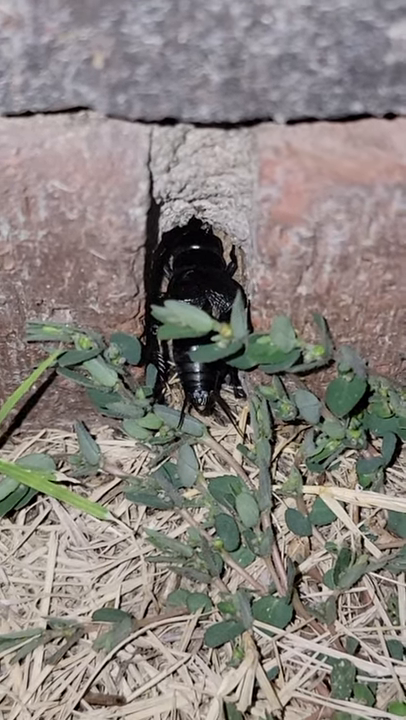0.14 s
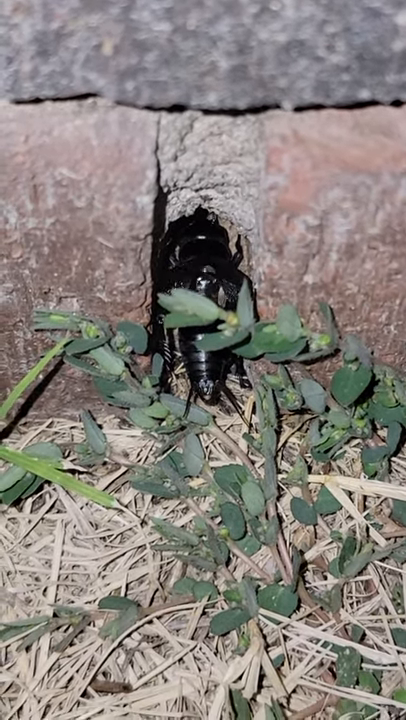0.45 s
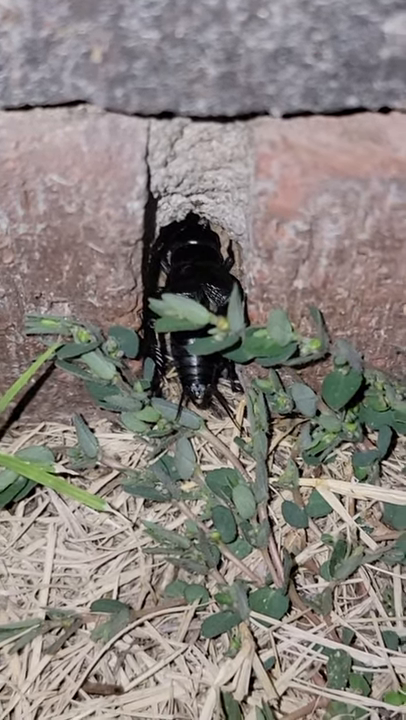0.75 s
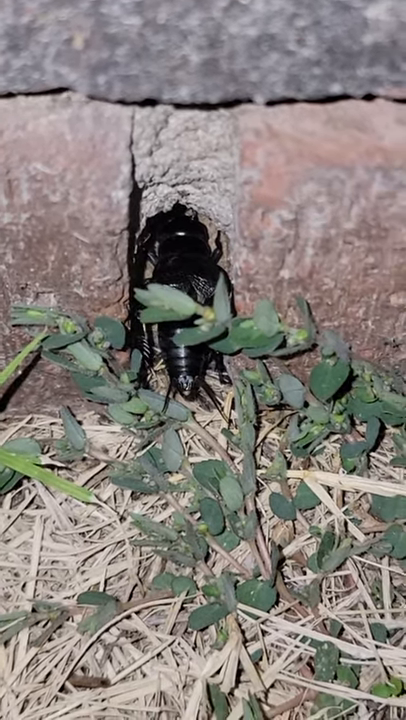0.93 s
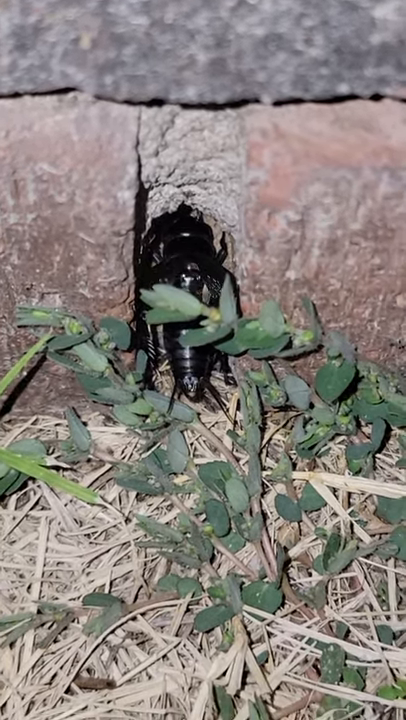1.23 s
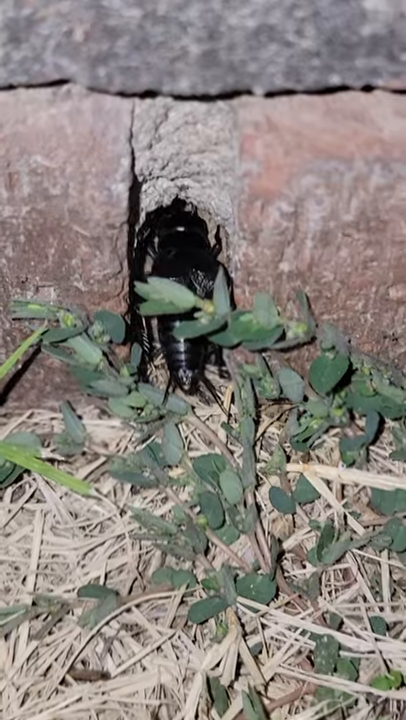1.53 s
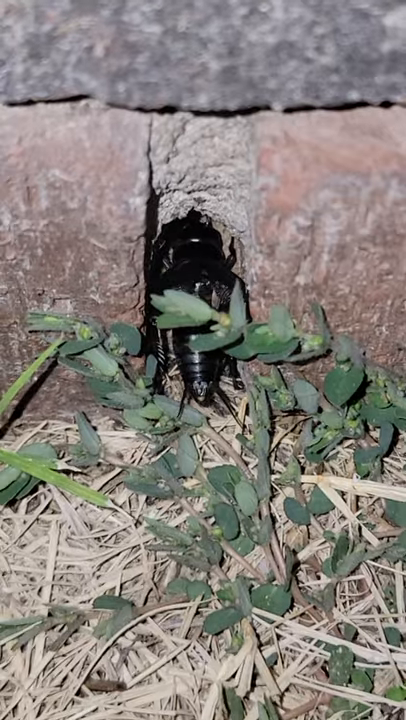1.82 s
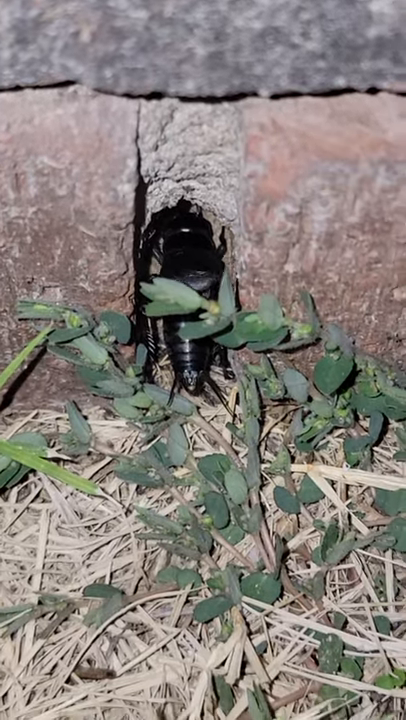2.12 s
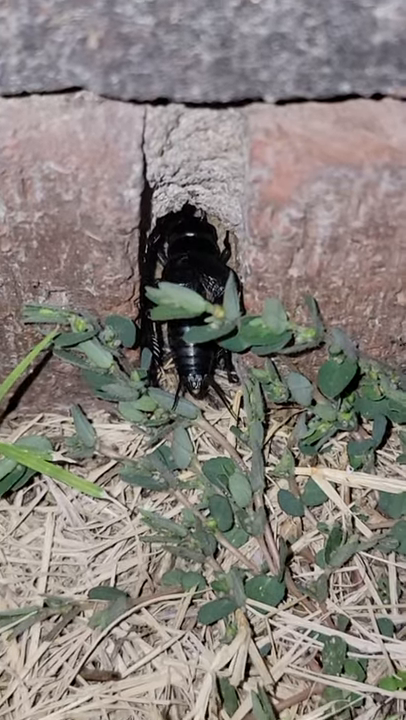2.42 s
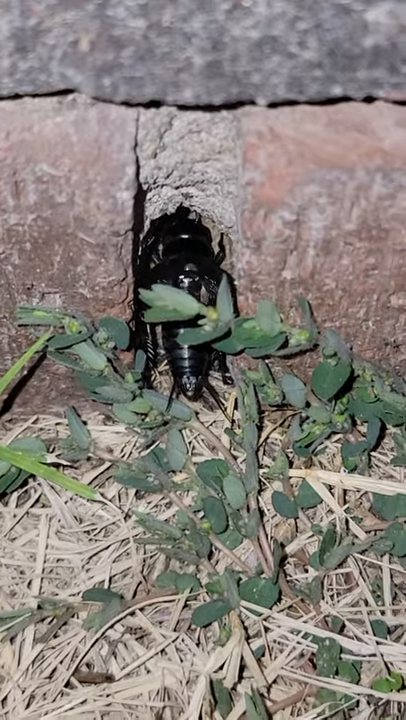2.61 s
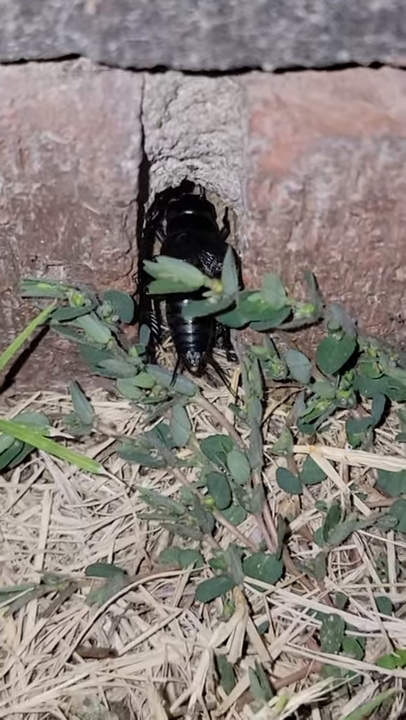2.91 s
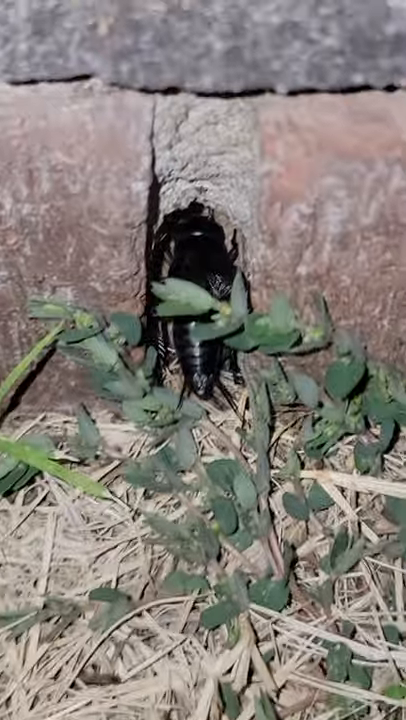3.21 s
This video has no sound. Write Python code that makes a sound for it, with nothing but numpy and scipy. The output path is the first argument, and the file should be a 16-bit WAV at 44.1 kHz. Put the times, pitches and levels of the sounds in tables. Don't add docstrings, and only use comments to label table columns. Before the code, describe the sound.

A close field cricket gives four bright, pure chirps near 4 kHz, at about 0.4, 1.1, 1.85 and 2.6 seconds, each four quick pulses growing stronger. Distant traffic rumbles softly while a car fades away; a thin far squeak sounds at 0.6. Light phone thumps come around 1.3 to 2.3, then heavy knocks, ticks and grassy rustling from 2.9, with a final cricket note at 3.3.

```python
import sys
import numpy as np
from scipy import signal
from scipy.fft import rfft, irfft
from scipy.io import wavfile
from scipy.ndimage import uniform_filter1d

SR = 44100
rng = np.random.default_rng(int(sys.argv[2]) if len(sys.argv) > 2 else 0)


def natural_amplitude(level_db):
    exponent = np.asarray(level_db, float) / 20
    return 10 ** exponent


def put_to_file(sound):
    columns = np.atleast_2d(sound).T
    safe = np.clip(columns, -1, 1)
    whole_steps = np.round(safe * 32767)
    wavfile.write(sys.argv[1], SR, whole_steps.astype(np.int16))


N = 147735
LEFT_LAG_S = 0.00042

# time in seconds, half-width of the gap in seconds, snap level in dB.
SKIP_MOMENTS = [(0.4225, .0002, -44), (0.4284, .001, -38), (0.432, .001, -42), (0.4348, .001, -42),
                (0.438, .0012, -45.5), (0.441, .0003, -44), (1.205, 0.00025, -54), (1.8587, .0015, -41),
                (1.863, .002, -43.5), (1.866, .0012, -35), (1.929, .0012, -34.5), (2.583, .0002, -43),
                (2.5865, .0009, -42.5), (2.589, .0008, -42), (2.5935, .001, -38.5), (2.598, .0012, -51),
                (2.6, .0008, -42.5), (3.335, 0.00078, -34), (3.339, 0.00075, -42.5), (3.3435, .001, -41),
                (3.348, .001, -44)]


def evened(x):
    return x / np.sqrt(np.mean(x ** 2) + 1e-20)


def read(points, hz):
    f, value = np.transpose(points)
    return np.interp(np.log(hz + 1), np.log(f + 1), value)


def add(mix, s, sound):
    part = mix[..., round(s * SR):][..., :sound.shape[-1]]
    part += sound[..., :part.shape[-1]]


def panned(pan_db):
    return natural_amplitude([[min(pan_db, 0)], [min(-pan_db, 0)]])


def noise(colour, same, patchy_db, size):
    hop = size // 4
    hz = np.fft.rfftfreq(size, 1 / SR)
    a, b, c, d, patches = rng.standard_normal((N // hop + 9, len(hz), 5)).T
    patches = uniform_filter1d(patches, size=8, axis=0)
    patches = evened(uniform_filter1d(patches, size=8, axis=1))
    same = np.clip(read(same, hz), -1, 1)[:, None]
    left = a + 1j * b
    right = same * left + np.sqrt(1 - same ** 2) * (c + 1j * d)
    z = np.array([left, right]) * natural_amplitude(read(colour, hz)[:, None] + patchy_db * patches)
    return evened(signal.istft(z, nperseg=size, noverlap=size - hop)[1][:, size:size + N])


def traffic():
    # frequency in Hz, level in dB per Hz.
    rumble_colour = [(8.8, -58), (15, -34.5), (37, -4.5), (70, 1.5), (124, -5), (144, -19.5), (223, -11.5),
                     (262, -23.5), (500, -39), (650, -38), (1100, -120)]
    # frequency in Hz, level in dB per Hz.
    hush_colour = [(180, -49), (300, -11), (518, -10), (1080, -21), (1190, -27.5), (1380, -23.5),
                   (1800, -34), (3210, -38.5), (15800, -58)]
    # frequency in Hz, level in dB per Hz.
    car_colour = [(150, -43), (230, -6.5), (340, 2), (450, -4), (620, -12.5), (1000, -37.5), (3000, -89.5)]
    # frequency in Hz, likeness from 0 to 1.
    likeness = [(60, 0.82), (130, 1), (290, 1), (640, 0.01), (1410, 0.11), (3100, 0), (15000, 0)]
    # time in seconds, level in dB.
    passing = [
        (0, 1),
        (.5, 1),
        (1.2, 1.5),
        (2, 0),
        (2.6, 1),
        (3.35, 4),
    ]
    t = np.arange(N) / SR
    swell_db = np.interp(t, *np.transpose(passing))
    rumble = noise([(5, -84.5)] + rumble_colour + [(700, -80)], likeness, patchy_db=1, size=4096)
    rumble = rumble * natural_amplitude(-33.5 + 0.28 * swell_db) * natural_amplitude([[.8], [-.8]])
    hush = noise([(200, -65)] + hush_colour, likeness, patchy_db=1.73, size=1024)
    hush = hush * natural_amplitude(-49.5 + swell_db)
    car = noise(car_colour, likeness, patchy_db=2.0, size=2048)
    fade_db_per_s = -14.5
    return rumble + hush + car * natural_amplitude(-43 + fade_db_per_s * t)


def far_squeak():
    # time in seconds, pitch in Hz, level in dB.
    glide = [
        (0.499, 1380, -82),
        (0.521, 1382, -60),
        (0.571, 1370, -47),
        (.63, 1345, -41.5),
        (0.661, 1300, -58),
        (0.684, 1300, -85),
        (.75, 1330, -76),
        (.77, 1330, -51),
        (.79, 1320, -93),
    ]
    t = np.arange(N) / SR
    s, hz, db = np.transpose(glide)
    phase = 2 * np.pi * np.cumsum(np.interp(t, s, hz)) / SR
    return natural_amplitude(np.interp(t, s, db, -200, -200)) * np.sin(phase)


def street():
    t = np.arange(N) / SR
    left, right = traffic() + far_squeak()
    return np.array([np.interp(t - LEFT_LAG_S, t, left), right])


def rustle():
    # frequency in Hz, level in dB per Hz.
    grass_colour = [(290, -60), (500, -25), (782, -10.5), (1040, -6.5), (2180, -11), (5500, -19),
                    (9000, -30.5), (15800, -48)]
    # time in seconds, level in dB.
    rubbing = [(2.89, -69.5), (2.95, -54), (2.96, -47), (2.997, -54.5), (3.0, -39.5), (3.04, -51.5),
               (3.11, -50.5), (3.205, -56.5), (3.208, -36.5), (3.225, -39), (3.24, -43), (3.28, -39.5),
               (3.35, -43.5)]
    t = np.arange(N) / SR
    grass = noise(grass_colour, [(600, 0.21), (1400, 0.72), (3100, 0.26)], patchy_db=1.5, size=256)
    return grass * natural_amplitude(np.interp(t, *np.transpose(rubbing))) * (t > rubbing[0][0])


def knocks():
    # time in seconds, peak level in dB, starting pitch in Hz, left-right balance in dB,
    # time to fade by 60 dB in seconds.
    thumps = [(1.291, -7, 136, 14, 0.033), (1.449, -8, 137, 11.5, 0.097), (1.502, -20, 106.3, -2, 0.067),
              (2.212, -19, 138, 9, 0.025), (2.22, -14.5, 110, 19, 0.075), (2.309, -10, 120.5, 13.5, 0.12),
              (2.85, -17, 93, 5.5, 0.13), (2.905, -16, 155, 16, 0.17), (2.92, -11, 99, 11, 0.42),
              (2.9638, 4, 114, 15, 0.013), (2.983, -2.5, 251, 14, 0.0099), (2.988, -4, 70.5, 4.5, 0.072),
              (3.005, -5.5, 80, -8.5, 0.045), (3.0406, -5.5, 303, -18, 0.021), (3.0534, 3, 118.6, -4, 0.04),
              (3.156, -13.5, 124, -3, 0.07), (3.212, -9.5, 256, -7.5, 0.011),
              (3.2345, -15.5, 300, -10, 0.008), (3.2332, -14.5, 134, -0.5, 0.11)]
    out = np.zeros((2, N))
    lead, low_hz, sag_s, rise_s = .01, 62, .008, .0025
    t = np.arange(0, .2, 1 / SR) - lead
    after = np.maximum(t, 0)
    for s, peak_db, hz, pan_db, t60 in thumps:
        sagging = low_hz * t + (hz - low_hz) * sag_s * (1 - np.exp(-after / sag_s))
        turns = np.where(t < 0, hz * t, sagging)
        env = natural_amplitude(peak_db - 60 * after / t60) / (1 + np.exp(-(t - 0.26 / hz) / rise_s * hz / 130))
        env = env * np.minimum((t + lead) / lead * 2, 1)
        overtone = 0.39 * np.cos(4 * np.pi * turns + 0.18) * np.exp(-abs(t) / 0.0021)
        thud = np.cos(2 * np.pi * turns) + overtone
        add(out, s - lead, panned(pan_db) * env * 1.445 * thud)
    return out


def pulls():
    # time in seconds, depth in dB, width in seconds, left-right balance in dB.
    dips = [
        (2.9613, -9.5, 0.00072, 10),
        (3.052, 2.5, 0.00083, -9.5),
        (3.2328, -7.5, .0004, -8.5),
    ]
    t = np.arange(N) / SR
    out = np.zeros((2, N))
    for s, depth_db, width, pan_db in dips:
        out -= panned(pan_db) * natural_amplitude(depth_db) * np.exp(-((t - s) / width) ** 2)
    return out


def tick(peak_db, pan_db, top_hz):
    t = np.arange(1200) / SR
    rattle = rng.standard_normal((3, len(t)))
    both_sides, each_side = rattle[:1], rattle[1:]
    t60_s, snap = .012, 2.5
    sound = (both_sides + 1.8 * each_side) * natural_amplitude(-60 * t / t60_s) + snap * (t == 0)
    for order, hz, kind in ((2, 490, "high"), (1, 1770, "low"), (3, top_hz, "low")):
        sound = signal.lfilter(*signal.butter(order, hz, kind, fs=SR), sound)
    return panned(pan_db) * natural_amplitude(peak_db + 3.5) * sound / abs(sound).max()


def handling():
    # time in seconds, peak level in dB, left-right balance in dB, highest frequency in Hz.
    case_ticks = [(2.9159, -36, 5.5, 4800), (2.9555, -29, 1, 3000), (2.963, -41, -5, 3000),
                  (2.96, -48, 5, 6000), (2.968, -54, 14, 4960), (2.981, -33.5, -10, 2500),
                  (2.9993, -27, 8, 4430), (3.0005, -27.5, -1, 2950), (3.0045, -56, 7, 6900),
                  (3.007, -38, 16, 3500), (3.0503, -24.5, 2.5, 7400), (3.208, -20, -12, 4470),
                  (3.2093, -37.5, 7, 5800), (3.218, -29, 22, 3400), (3.2328, -19, -10, 1450)]
    out = rustle() + knocks() + pulls()
    for s, *row in case_ticks:
        add(out, s, tick(*row))
    return out


def wing(drive):
    # frequency in Hz, width in Hz, level in dB.
    resonances = [(2060, 680, -7.5), (2870, 750, -3), (3706, 350, 11), (4420, 270, 2.5), (5300, 590, -5.5),
                  (6140, 750, 3), (7300, 320, -4.5), (8850, 1100, -8), (12300, 3300, -12.5),
                  (15000, 3200, -17)]
    out = 0
    for hz, width, db in resonances:
        b, a = signal.iirpeak(hz, hz / width, SR)
        out = out + natural_amplitude(db) * signal.lfilter(b, a, signal.lfilter(b, a, drive))
    return out


def stroke(start, length, level_db, top_hz, lag):
    catch_s, rest_hz = 0.0017, 3683
    t = np.arange(0, length + .006, 1 / SR) - lag - catch_s
    u = np.clip(t / (length - catch_s), 0, 1)
    span = max(top_hz - rest_hz, 40)
    turn = length - span / 29000
    climb = np.sin(np.pi / 2 * np.clip(t / turn, 0, 1)) ** 2
    sag = np.clip((t - turn) / (length - turn), 0, 1) ** 1.9
    sag = sag * np.interp(top_hz, (4100, 4250), (.45, 1))
    hz = top_hz - span * (0.32 * (1 - climb) + sag)
    phase = 2 * np.pi * (np.cumsum(hz) / SR - lag * hz[0])
    attack_share, release_share = 0.32, 0.28
    env = np.sin(np.pi / 2 * np.clip(u / attack_share, 0, 1)) ** .7
    env = env * np.clip((1 - u) / release_share, 0, 1) ** .5
    env = uniform_filter1d(uniform_filter1d(np.roll(env, 24), size=24), size=24)
    for s, gap, _ in SKIP_MOMENTS:
        env = env * (1 - np.exp(-((start + t - s) / gap) ** 2))
        phase = phase + 2.4 * (start + t > s)
    second_db = -20.5 - 24 * (u - 0.64) ** 2
    third_db = -30.5 + .5 * (level_db + 38.5) - 100 * (u - 0.41) ** 2
    upper = natural_amplitude(second_db) * np.sin(2 * phase) + natural_amplitude(third_db) * np.sin(3 * phase)
    is_left = lag > 0
    side_db = (-7 + 7.5 * (top_hz - 4240) / 1000) * is_left
    upper = upper * natural_amplitude(-3.5 * is_left + 0.12 * (level_db + 17))
    return natural_amplitude(level_db + 3.5 + side_db) * env * (np.sin(phase) + upper)


def hiss(drive, low_hz):
    return signal.lfilter(*signal.butter(4, low_hz, "high", fs=SR), drive * rng.standard_normal(N))


def yard_echo(sound):
    t60_s = 0.36
    t = np.arange(SR // 2) / SR
    tail = rng.standard_normal((2, len(t))) * natural_amplitude(-60 * t / t60_s) * np.minimum(t / .012, 1)
    tail = signal.lfilter(*signal.butter(2, 6000, fs=SR), tail)
    tail = tail / np.linalg.norm(tail[0])
    return natural_amplitude(-39.5) * signal.fftconvolve(sound[None], tail, axes=1)[:, :N]


def cricket():
    # start in seconds, length in seconds, level in dB, top pitch in Hz.
    closings = [(0.4216, 0.022, -37.5, 3870), (0.484, 0.029, -36.5, 4024), (0.571, 0.039, -28, 4264),
                (0.6808, 0.044, -28, 4266), (1.1278, 0.026, -35.5, 4040), (1.1887, 0.034, -32.5, 4080),
                (1.278, 0.045, -28, 4250), (1.3933, 0.044, -28, 4260), (1.848, 0.025, -36, 3880),
                (1.9092, 0.037, -34, 4160), (1.9918, 0.045, -28.5, 4250), (2.102, 0.046, -28.5, 4263),
                (2.579, 0.024, -36, 3870), (2.6423, 0.029, -35.5, 4037), (2.723, 0.041, -28.5, 4237),
                (2.8336, 0.045, -29.5, 4260)]
    # start in seconds, length in seconds, level in dB, top pitch in Hz.
    touches = [
        (0.381, 0.024, -54.5, 3770),
        (1.091, 0.025, -53, 3670),
        (1.813, 0.022, -55, 3630),
        (2.535, 0.033, -53, 3720),
        (3.197, 0.0058, -49, 3970),
        (3.325, 0.088, -31, 4070),
    ]
    song, drive, t = np.zeros((2, N)), np.zeros(N), np.arange(N) / SR
    for start, length, level_db, top_hz in closings + touches:
        both = np.array([stroke(start, length, level_db, top_hz, lag) for lag in (LEFT_LAG_S, 0)])
        if level_db < -50:
            both = both * evened(uniform_filter1d(rng.standard_normal(4000), size=130))[:both.shape[1]]
        add(song, start, both)
        for s, snap_db in ((start - 0.00083, -14.5), (start + length, -30.5)):
            drive += natural_amplitude(level_db + snap_db) * np.exp(-((t - s) / .002) ** 2)
    reopen_after_s, reopen_length_s = .014, 0.03
    for start, length, _, _ in closings:
        middle = start + length + reopen_after_s
        drive += natural_amplitude(-53.5) * np.exp(-((t - middle) / (reopen_length_s / 2)) ** 2)
    for s, _, snap_db in SKIP_MOMENTS:
        drive += natural_amplitude(snap_db) * np.exp(-((t - s) / 0.0026) ** 2)
    drive += natural_amplitude(-25) * uniform_filter1d(abs(song[1]), size=44)
    scrape = wing(drive * rng.standard_normal(N) * np.sqrt(rng.exponential(1, N)))
    scrape += natural_amplitude(-25.5) * hiss(drive, 10500)
    lumps = uniform_filter1d(rng.exponential(1, N) ** 3, size=400) / 60
    lumps = lumps * uniform_filter1d(abs(song[1]) ** .5, size=200)
    scrape += natural_amplitude(-52 + 25.5) * hiss(lumps, 11000)
    song += np.array([natural_amplitude(-7) * np.roll(scrape, round(LEFT_LAG_S * SR)), scrape])
    return song + yard_echo(song[1])


def scene():
    return street() + handling() + cricket()


def roll_off(x):
    return signal.sosfilt(signal.butter(12, 15920, fs=SR, output="sos"), x)


def record(dry):
    notch_hz, notch_db, notch_width_hz, open_s = 10370, -9.5, 2200, 0.0049
    hz = np.fft.rfftfreq(N + SR, 1 / SR)
    dip = natural_amplitude(notch_db * np.exp(-((hz - notch_hz) / notch_width_hz) ** 2))
    port = irfft(rfft(dry, N + SR) * dip, N + SR)[:, :N]
    band_limit = signal.ellip(10, .3, 70, 15750, fs=SR, output="sos")
    mix = signal.sosfilt(band_limit, np.clip(port, -.98, .98))
    mix = mix * np.minimum(np.arange(N) / SR / open_s, 1)
    return roll_off(mix)


dry = scene()
out = record(dry)
put_to_file(out)
```